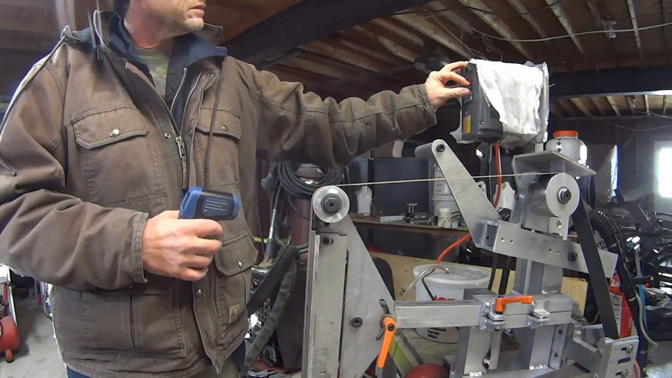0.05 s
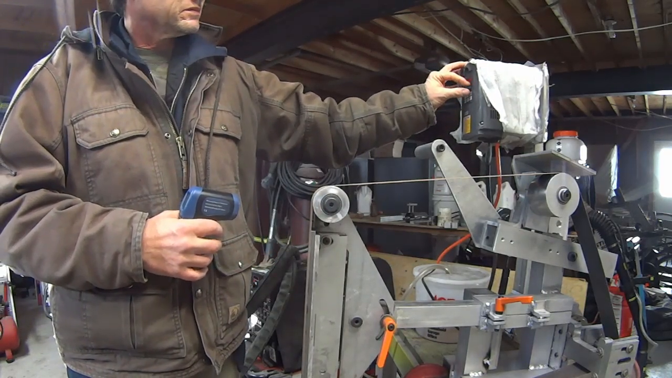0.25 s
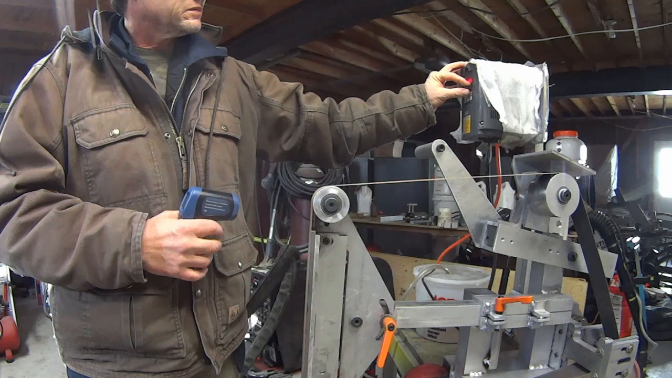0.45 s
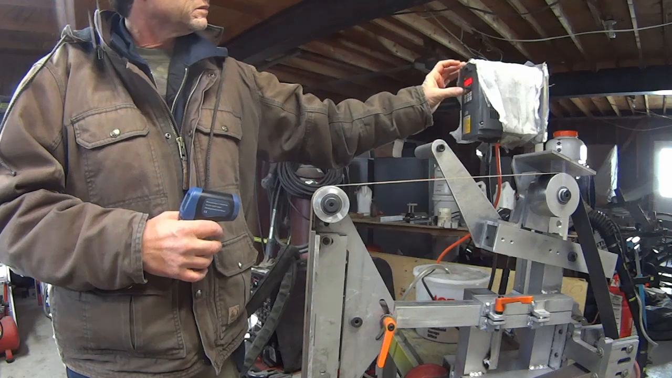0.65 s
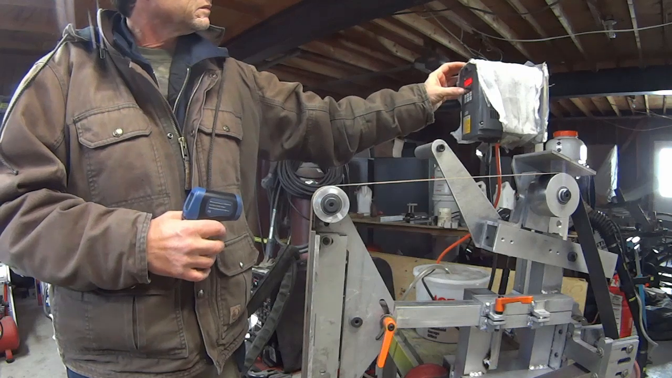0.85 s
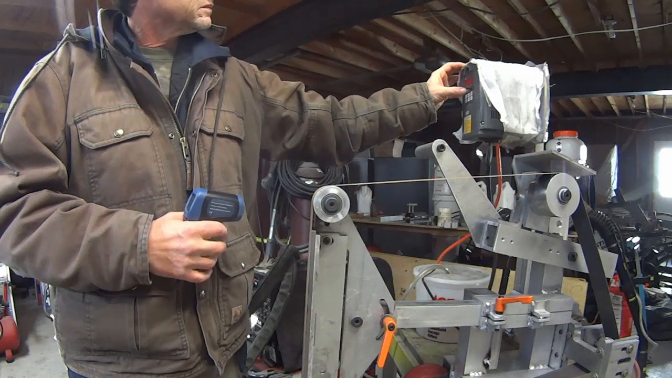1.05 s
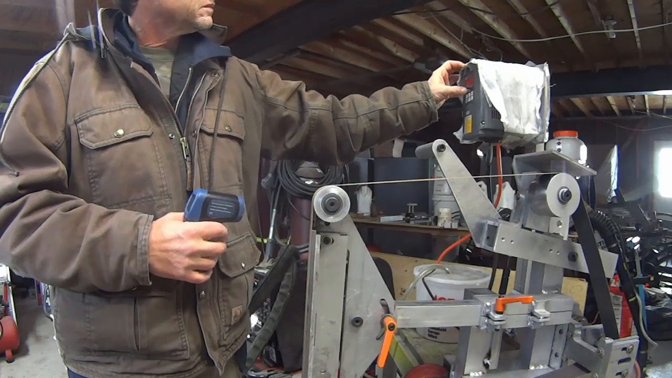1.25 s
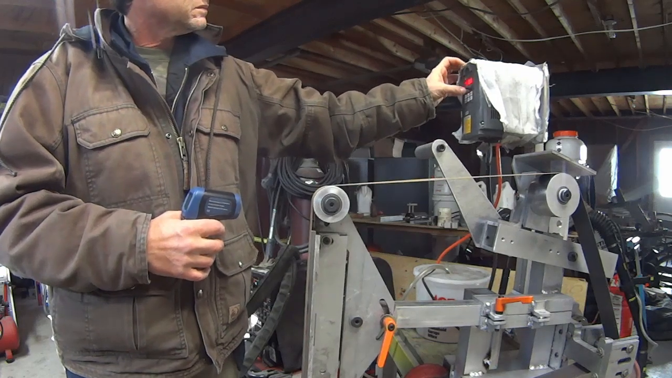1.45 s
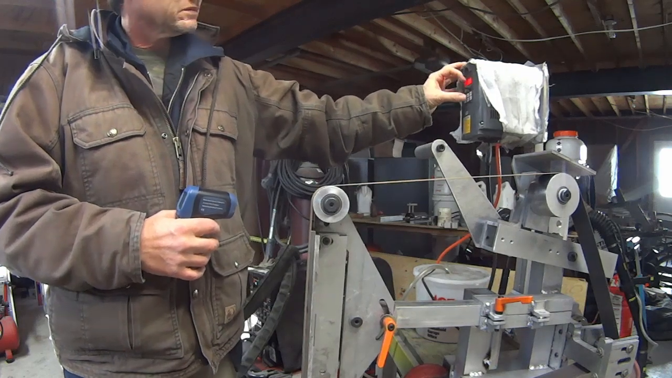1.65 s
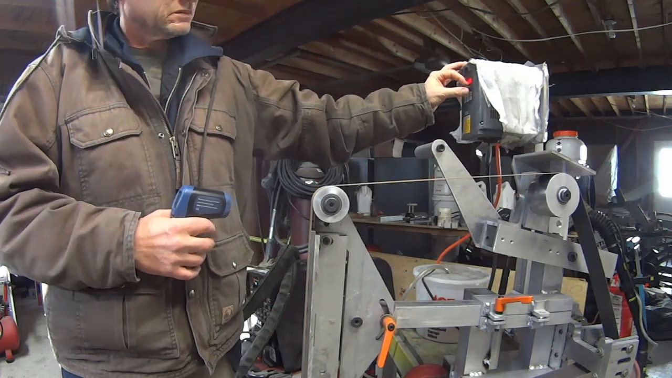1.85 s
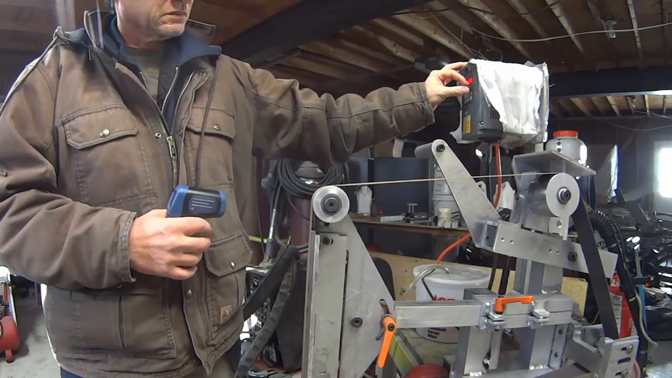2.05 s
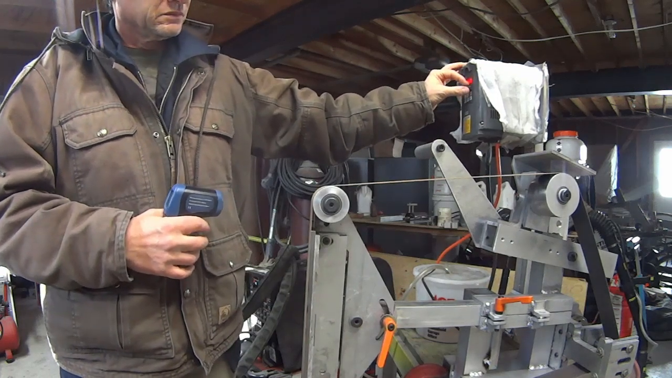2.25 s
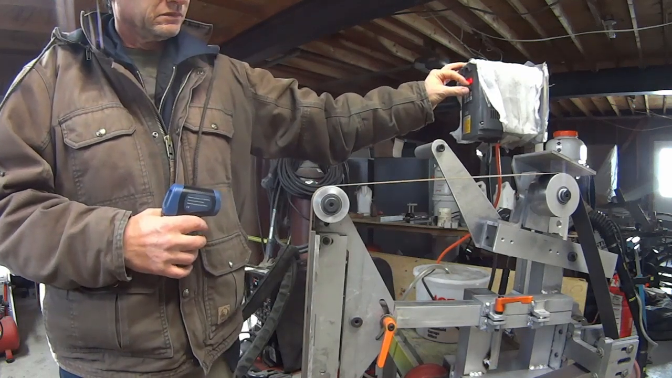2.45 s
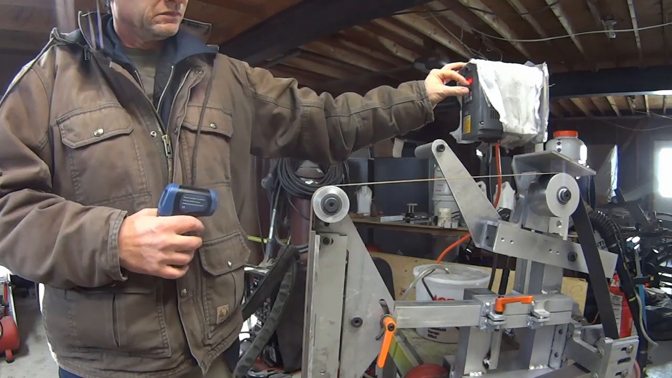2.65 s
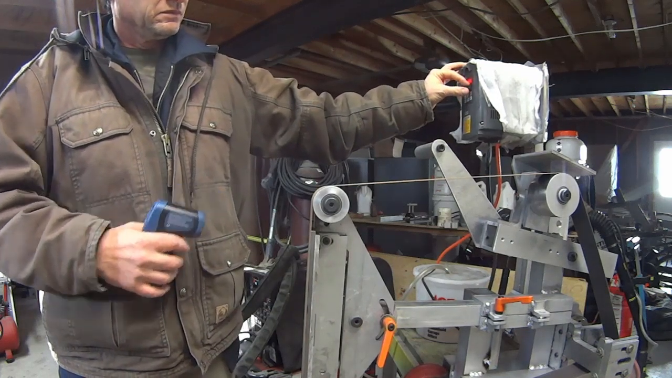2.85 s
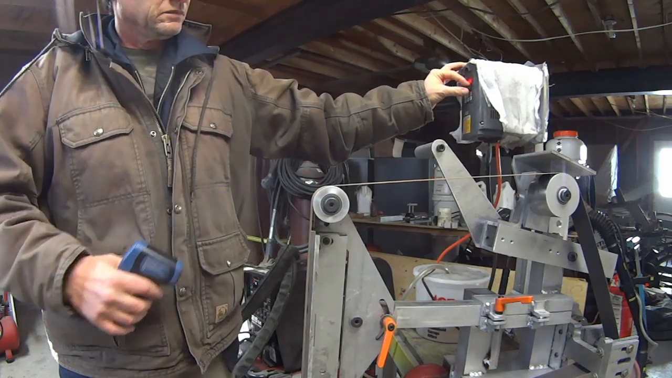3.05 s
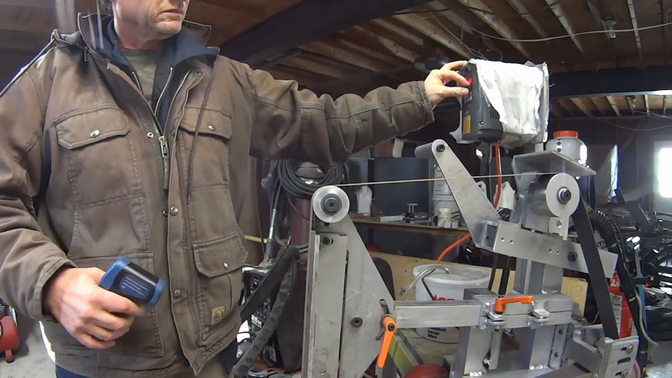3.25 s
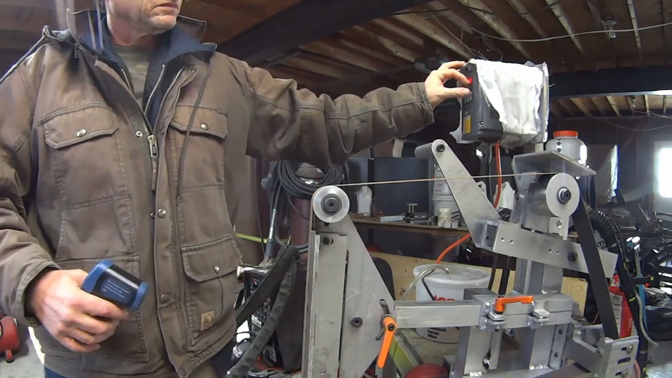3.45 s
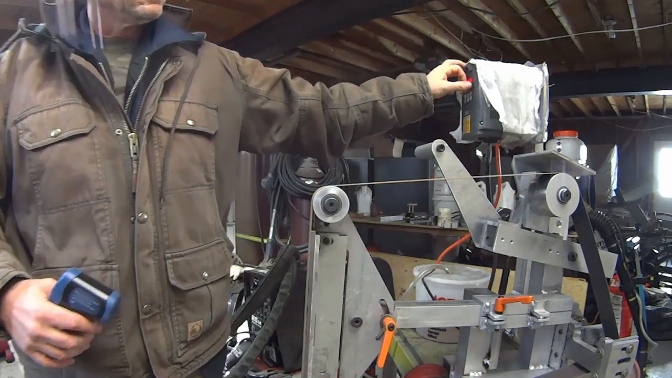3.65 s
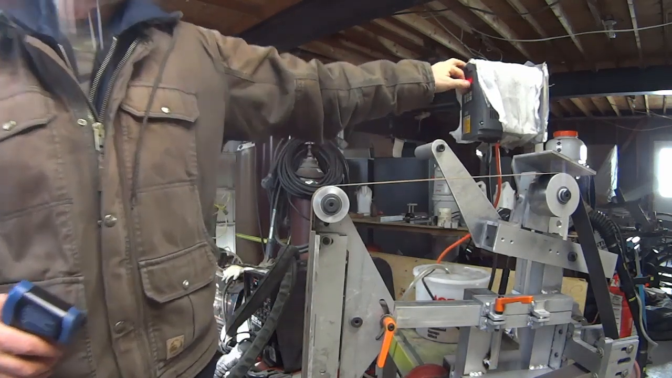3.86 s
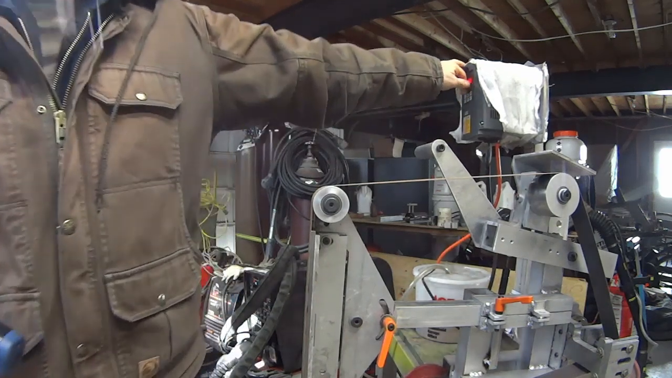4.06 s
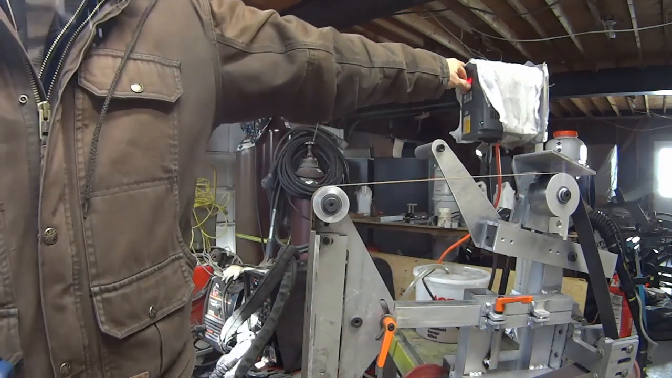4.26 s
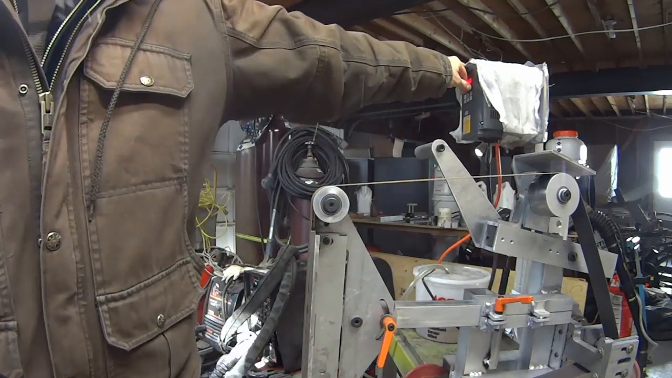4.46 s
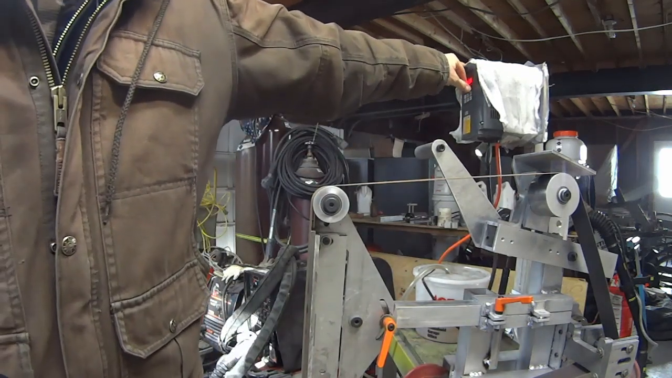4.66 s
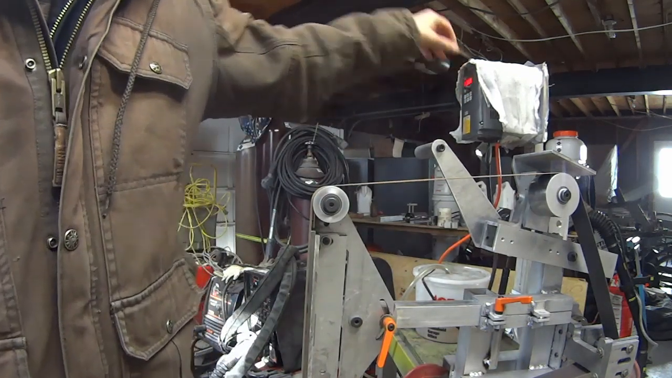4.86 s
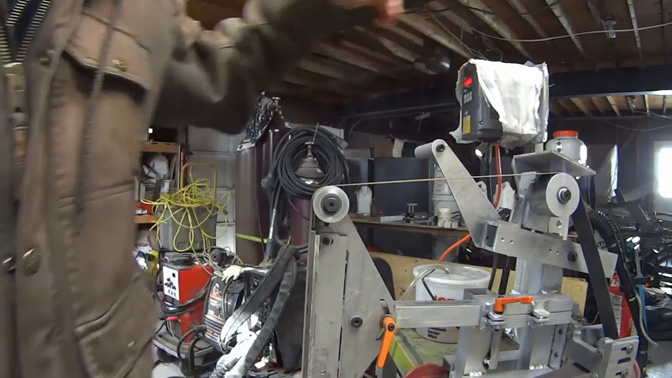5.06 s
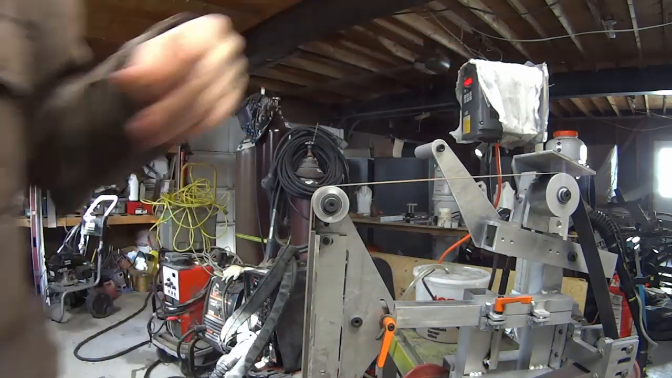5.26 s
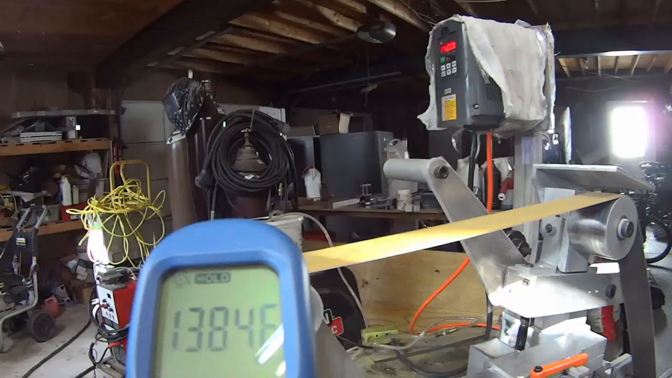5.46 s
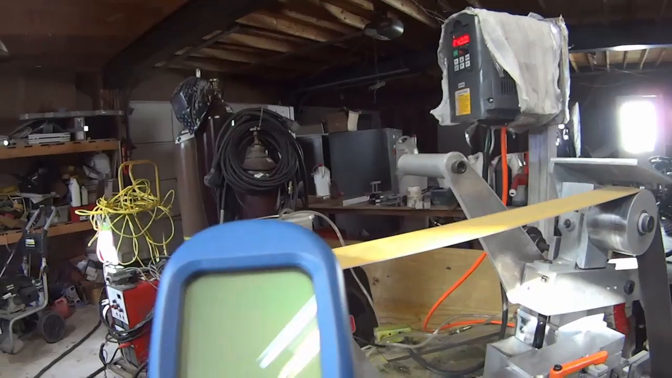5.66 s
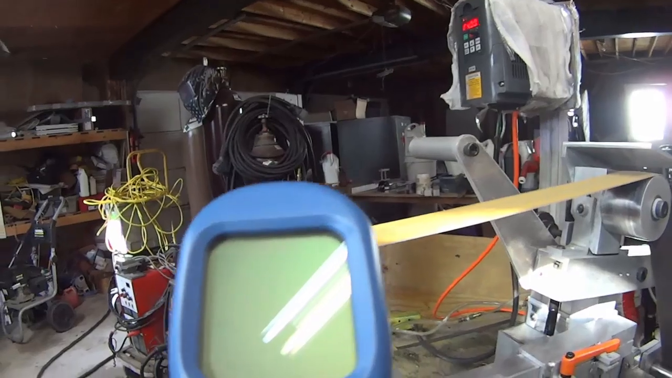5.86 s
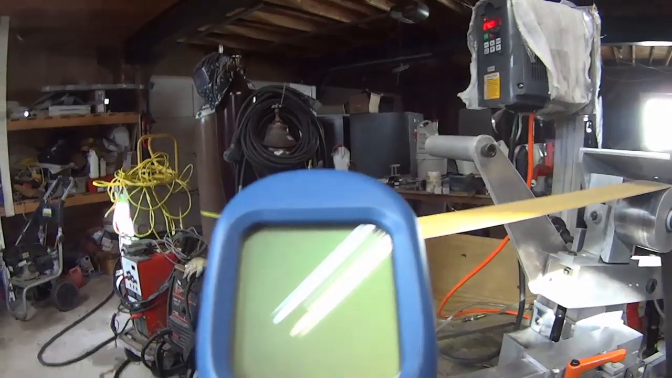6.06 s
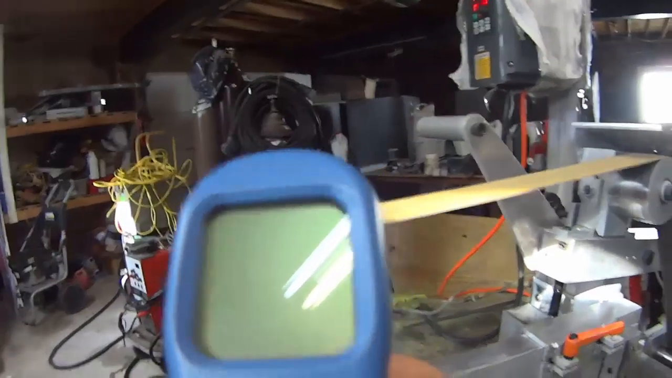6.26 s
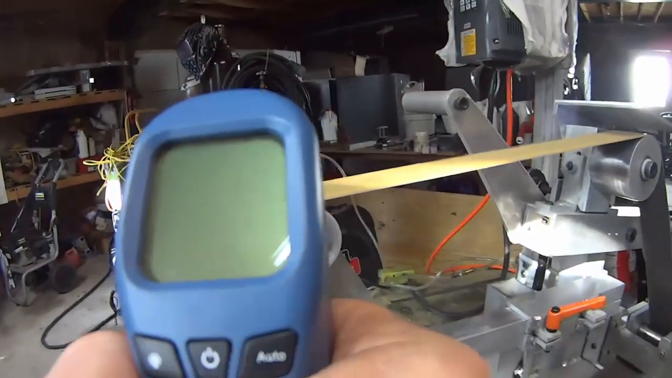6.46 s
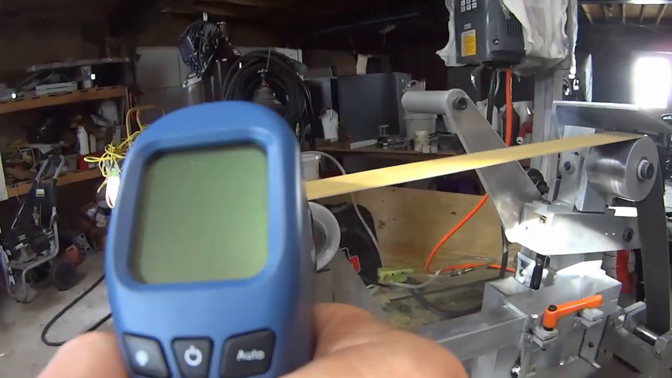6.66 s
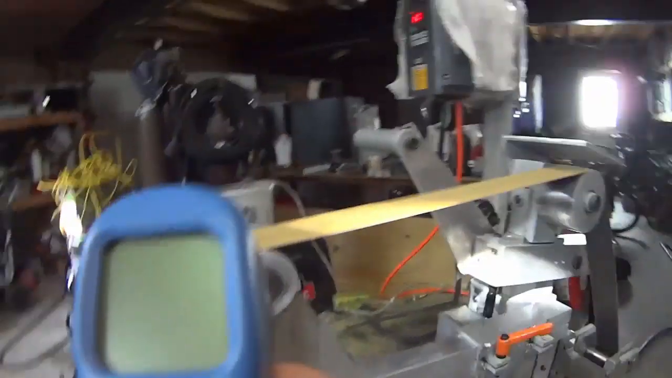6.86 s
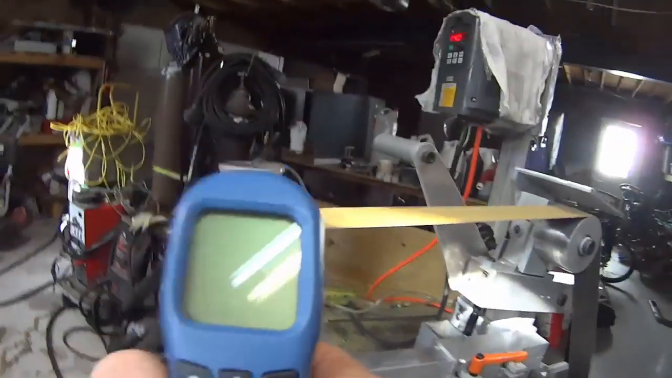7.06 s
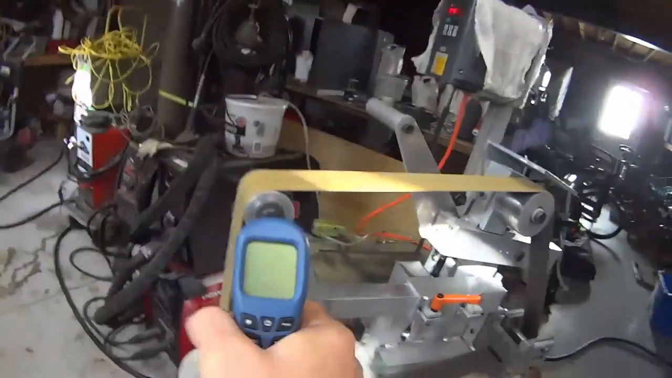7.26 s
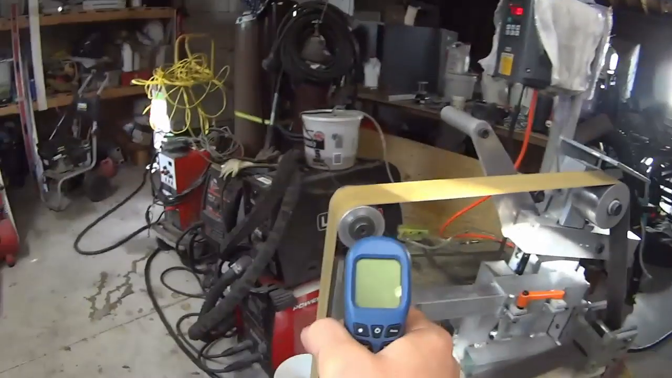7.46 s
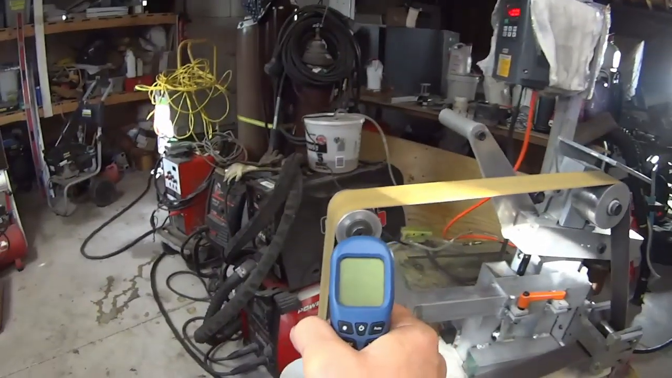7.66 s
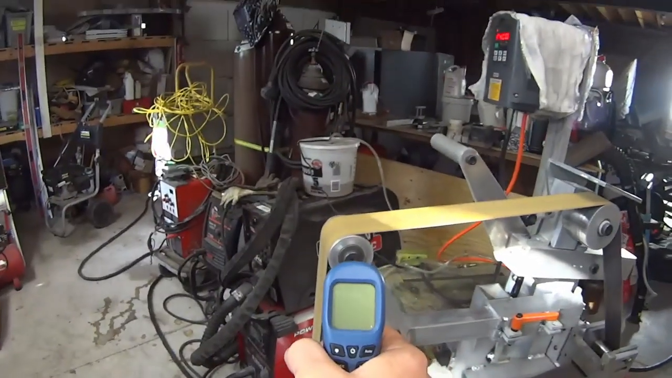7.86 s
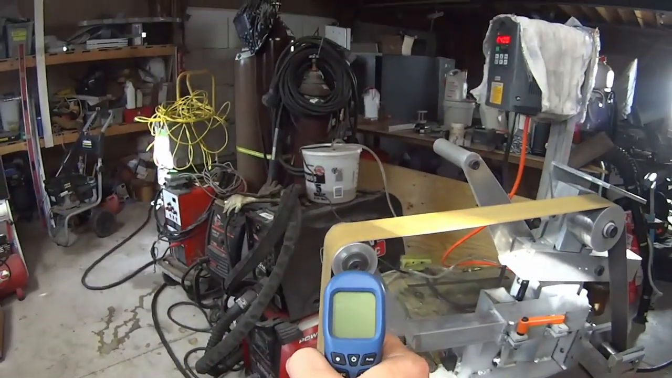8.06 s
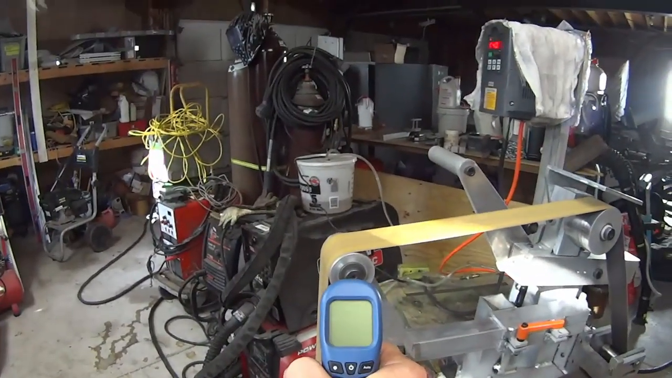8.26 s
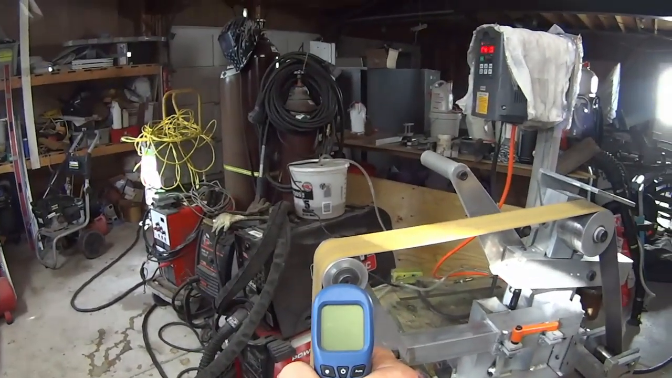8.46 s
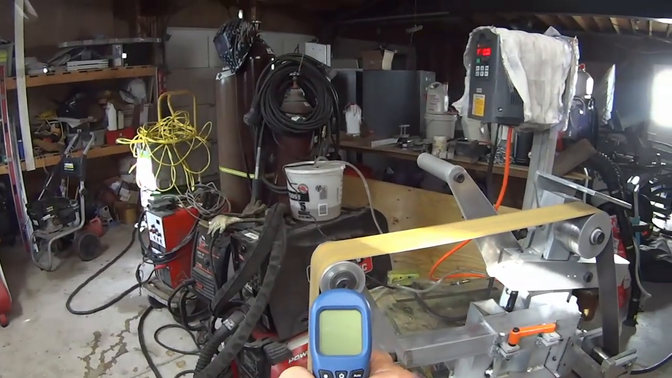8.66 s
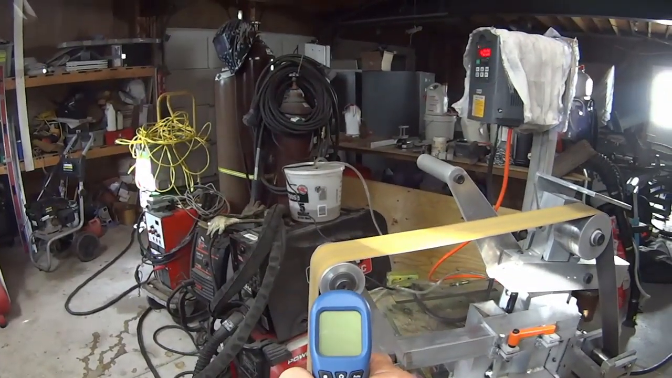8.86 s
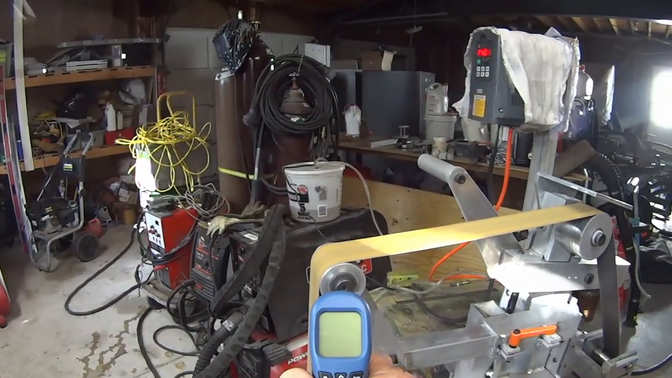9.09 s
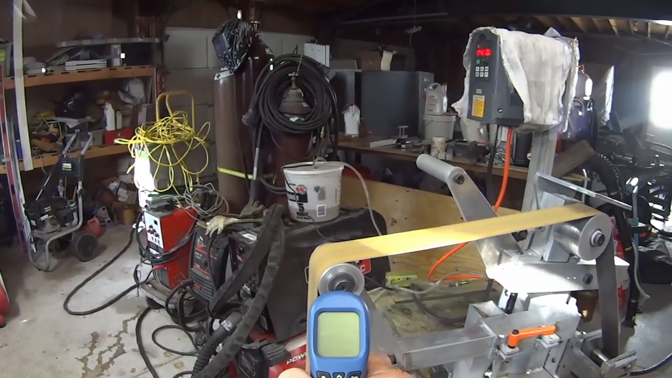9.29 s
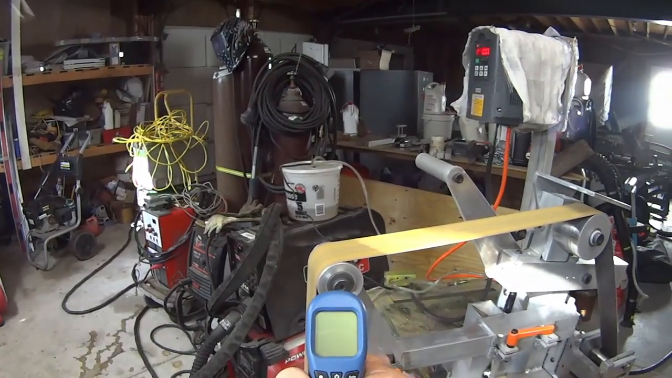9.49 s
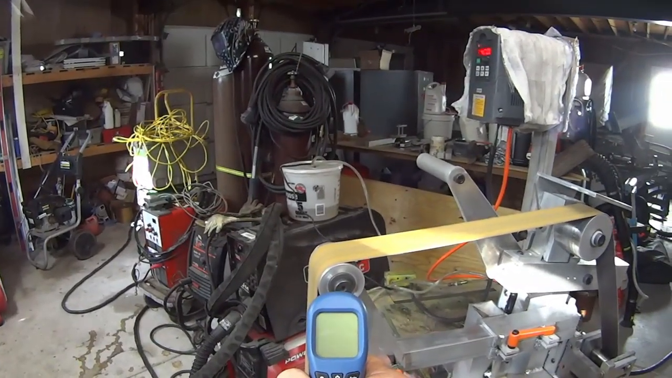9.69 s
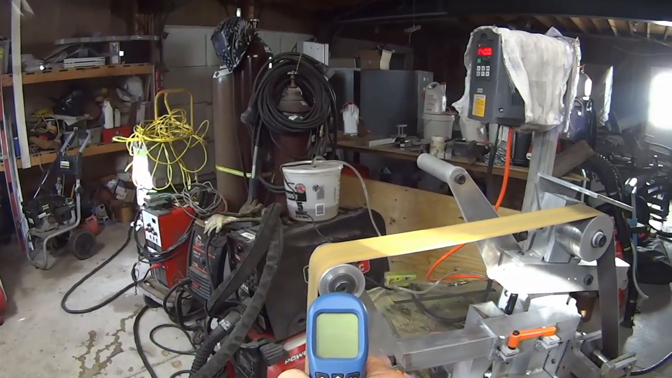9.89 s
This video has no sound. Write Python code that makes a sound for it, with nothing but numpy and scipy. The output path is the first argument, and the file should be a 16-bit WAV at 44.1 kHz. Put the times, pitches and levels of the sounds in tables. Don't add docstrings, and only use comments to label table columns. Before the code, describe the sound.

In a workshop, faint keypad clicks start a belt grinder; motor hum swells into a rising, whining roar, then cuts abruptly to a close, steady roar.

```python
import sys
import numpy as np
from scipy import signal
from scipy.fft import rfft, irfft
from scipy.io import wavfile
from scipy.ndimage import uniform_filter1d

SR = 44100
rng = np.random.default_rng(int(sys.argv[2]) if len(sys.argv) > 2 else 0)


def generate_wav(signal):
    frames = np.transpose(np.atleast_2d(signal))
    scaled = np.clip(frames, -1, 1) * 32767
    pcm = np.round(scaled).astype(np.int16)
    wavfile.write(sys.argv[1], SR, pcm)


def ratio_of_db(decibels):
    return 10 ** (np.asarray(decibels, float) / 20)


N = 437913
T = np.arange(N) / SR
HZ = np.arange(N // 2 + 1) * SR / N
FULL_HZ = 394.3


def ports(common, pan_db, differing=0):
    left = (common + differing) * ratio_of_db(pan_db / 2)
    right = (common - differing) * ratio_of_db(-pan_db / 2)
    return np.array([left, right])


def walk(rate_hz):
    hold = max(int(SR / rate_hz), 2)
    steps = np.repeat(rng.standard_normal(N // hold + 1), hold)
    return 1.295 * uniform_filter1d(uniform_filter1d(steps, hold), hold)[:N]


def level_at(s, db):
    return np.interp(T, s, db, left=-120)


def resonance(hz, centre_hz, width_hz):
    return 1 / (1 + (2 * (hz - centre_hz) / width_hz) ** 2)


def colour_db(hz, points, frame=()):
    f, db = np.transpose(points)
    smooth = np.interp(np.log(hz + 1), np.log(f), db)
    return smooth + sum(lift * resonance(hz, centre, width) for centre, width, lift in frame)


def shaped(x, gain):
    y = irfft(rfft(x) * gain, N)
    return y / np.sqrt(np.mean(y ** 2))


def tone(hz, rms_db, lead=0.):
    return np.sqrt(2) * ratio_of_db(rms_db) * np.sin(2 * np.pi * np.cumsum(hz) / SR + lead)


def ring(s, peak_db, hz, t60):
    t = np.clip(T - s, 0, 1)
    return ratio_of_db(peak_db) * np.sin(2 * np.pi * hz * t) * np.exp(-np.log(1000) * t / t60)


# (time [s], rumble [dB], frame [dB], body [dB], hiss [dB], left minus right [dB])
BELT = [
    [(1.22, -65, -70, -72, -68, -1.5), (1.25, -66, -65, -61, -53, -1.0), (1.3, -47, -49, -47, -45, -2),
     (1.46, -46, -42.5, -43, -41, -1.5), (1.53, -49, -41.5, -37.5, -35.5, -2),
     (1.66, -42, -37, -35.5, -34.5, -2.0), (1.84, -44, -31, -29, -30.5, -1.5),
     (2.04, -40, -26.5, -18, -21, -2.0), (2.32, -46, -28.5, -18.5, -18.5, -2),
     (2.48, -47, -30.5, -19.5, -17.5, -2), (2.64, -50, -31, -19.5, -16.5, -2),
     (2.7, -44, -32.5, -19.5, -16.5, -2), (2.82, -47, -31, -18.5, -17.5, -2.5),
     (2.95, -48, -33.5, -19, -17.5, -2), (3.77, -50, -38.5, -24, -16, -1.5),
     (4.03, -46, -41, -26, -16.5, -2), (4.18, -49, -43, -24.5, -18, -1.5),
     (4.22, -46, -37.5, -24.5, -17, -1.5), (4.33, -48, -35.5, -26.5, -16.5, -2),
     (4.77, -48.5, -37, -25, -16, -1.5), (5.5, -48, -34.5, -24.5, -15, -2)],
    [(5.53, -45, -33, -21.5, -19, -4), (5.86, -43, -30.5, -23, -19.5, -4), (6.04, -47, -32.5, -22, -21, -5),
     (6.14, -36, -30, -22, -19.5, -3.0), (6.18, -32, -26, -22.5, -20.5, -2.5),
     (6.24, -42, -32, -23.5, -17.5, -2.5), (6.45, -41, -30.5, -21.5, -21, -3.0),
     (6.48, -39, -31, -22, -20.5, -4.5), (7.11, -42.5, -32, -22, -18, -3),
     (7.15, -44, -34, -22.5, -18, -2.5), (7.23, -42, -31, -23.5, -18, -2.0),
     (7.44, -42, -32, -23, -18.5, -4.5), (7.62, -43, -33.5, -24, -19.5, -5),
     (7.65, -41, -31.5, -22.5, -18.5, -3), (8.4, -43.5, -33, -23, -18.5, -3),
     (8.46, -48, -30, -24, -17.5, -2.0), (8.52, -42, -34, -24, -18.5, -3), (8.58, -42, -33, -24, -18, -2.5),
     (9.06, -43, -32, -21.5, -18, -3), (9.84, -45, -32, -22, -19, -4), (9.93, -39, -32, -22, -19, -2.5)],
]
BELT_EDGES_HZ = (0, 700, 2400, 4400, 20000)
# (frequency [Hz], density [dB per Hz])
RUMBLE_COLOUR = [(30, -7), (60, -13), (150, -4.5), (300, -2), (500, -3), (700, 0)]


def belt_noise(rows, colour, frame, noise_db, side_db):
    s, *bands_db, pan_db = np.transpose(rows)
    ticks = rng.standard_normal((2, N)) * ratio_of_db(1.5 * rng.exponential(size=(2, N)))
    joint_db = colour[1][1]
    points = RUMBLE_COLOUR[:-1] + [(f, db - joint_db) for f, db in colour[1:]]
    tint = ratio_of_db(colour_db(HZ, points, frame))
    pan = np.interp(T, s, pan_db)
    out = 0
    for k in range(4):
        band = tint * (HZ >= BELT_EDGES_HZ[k]) * (HZ < BELT_EDGES_HZ[k + 1])
        flicker_db = 0.55 * walk(9) + 0.75 * walk(40)
        db = level_at(s, bands_db[k]) + noise_db[k] + flicker_db
        differing = ratio_of_db(side_db[k]) * shaped(ticks[1], band)
        out = out + ratio_of_db(db) * ports(shaped(ticks[0], band), pan, differing)
    return out


# (frequency [Hz], density [dB per Hz])
FAR_COLOUR = [(410, -52), (700, -34.5), (1170, -20), (2390, -12.5), (2740, 2.5), (4340, -5.5), (5400, -4),
              (6060, -4.5), (6640, 3), (7980, -9), (9160, -11.5), (10900, -24.5), (14100, -61),
              (22000, -120)]
# (frequency [Hz], width [Hz], lift [dB])
FAR_FRAME = [(1077, 25, 9), (1252, 70, 7.5), (1494, 42, 4.5), (1920, 77, 2.5), (2650, 90, 0), (3240, 77, 2),
             (4790, 260, 3.5), (5384, 95, 6.5), (7140, 100, 4.5), (8370, 120, 6)]
# (rumble, frame, body, hiss [dB])
FAR_NOISE_DB = (-14, -1, -0.33, -2.5)
# (rumble, frame, body, hiss [dB])
FAR_SIDE_DB = (-3.5, -5.5, -10.5, -11)


def far_belt():
    return belt_noise(BELT[0], FAR_COLOUR, FAR_FRAME, FAR_NOISE_DB, FAR_SIDE_DB)


# (frequency [Hz], density [dB per Hz])
NEAR_COLOUR = [(410, -67), (700, -31.5), (999, -23.5), (1100, -18.5), (1160, -17), (1440, -14), (1580, -11),
               (1880, -15.5), (2840, -2.5), (4200, -6.5), (6800, -5), (8650, -11), (10900, -23),
               (14100, -61), (22000, -120)]
# (frequency [Hz], width [Hz], lift [dB])
NEAR_FRAME = [(1290, 92, 3), (2240, 150, 3.5), (2735, 160, 2.2), (3116, 90, 3.6), (3870, 44, 2.1),
              (4650, 250, 2.1), (5390, 230, 3.6), (6420, 90, 2.6), (7000, 150, 2.8), (8340, 150, 2.5)]
# (rumble, frame, body, hiss [dB])
NEAR_NOISE_DB = (-16.5, -3.5, -2.5, -3)
# (rumble, frame, body, hiss [dB])
NEAR_SIDE_DB = (-7, -1.5, -10, -10.5)


def near_belt():
    return belt_noise(BELT[1], NEAR_COLOUR, NEAR_FRAME, NEAR_NOISE_DB, NEAR_SIDE_DB)


# (time [s], ball-pass rate [Hz], level of that line [dB])
RUNUP = [(2.3, 86.6, -69), (2.4, 102.5, -59), (2.46, 102.3, -49), (2.6, 127.4, -62), (2.69, 134, -47),
         (2.77, 147, -44), (2.82, 151.0, -43), (2.94, 175.4, -65), (3.32, 216, -60), (3.34, 223, -54),
         (3.53, 250.8, -65), (3.64, 260.6, -52), (3.72, 269.4, -69), (3.82, 288.2, -48), (3.88, 293, -55),
         (4.04, 312, -40), (4.1, 322.8, -53), (4.48, 373, -49.5), (4.79, 393.4, -46.5), (5.5, 394.8, -51.5)]


def wheel_speed():
    s, hz, _ = np.transpose(RUNUP)
    return np.interp(T, [1.25, *s], [0, *hz]) / FULL_HZ


# (frequency [Hz], level [dB])
FAR_LINES = [(1184, -42), (1577, -42), (1728, -46.5), (1970, -45.5), (2121, -44), (2670, -41.5),
             (2939, -53), (3063, -34), (3155, -49.5), (3273, -49), (3865, -36), (4834, -39), (5190, -38.5),
             (5437, -59), (5545, -39.5), (5620, -28.5), (5690, -57), (5830, -47)]


def far_whine(speed):
    s, _, first_db = np.transpose(RUNUP)
    out = ports(tone(speed * FULL_HZ, level_at(s, first_db)), -6)
    for hz, db in FAR_LINES + [(2 * FULL_HZ, -58), (154, -62)]:
        moving_db = colour_db(hz * speed[::64], FAR_COLOUR, FAR_FRAME)
        crossing_db = moving_db - colour_db(hz, FAR_COLOUR, FAR_FRAME)
        lift_db = np.repeat(1.33 * np.maximum(crossing_db, -12), 64)[:N]
        now_db = db + lift_db + 12 * np.log10(speed + .01) + 2 * walk(6)
        lead = rng.uniform(-1.1, 1, 2)
        out += [tone(hz * speed, now_db - 3.5, lead[0]), tone(hz * speed, now_db - 0.5, lead[1])]
    return out


# (frequency [Hz], by the thermometer [dB], while swinging [dB],
# at the wheel [dB], left minus right [dB])
NEAR_LINES = [(394.4, -47.5, -49, -42.5, -6.5), (1012, -49, -52, -51, -4.5),
              (1182, -39.5, -41, -47.5, -6.5), (1580, -42.5, -43, -36.5, -4), (1748.2, -38.5, -44, -47, -1),
              (2152, -37.5, -41, -43.5, 0), (2252, -42, -40, -46, -4), (2300, -48, -41, -42, -4),
              (2378, -38, -38, -53, 4), (2560, -46, -47, -54, -3), (2760, -33, -30.5, -32.5, -10),
              (2830, -49, -35, -41, 3), (2934, -33.5, -32.5, -33, 2), (3096, -32, -30, -39.5, -0.5),
              (3147, -37, -39, -34.5, -9), (3900, -34, -35, -34, 1), (3927.1, -40, -48, -39.5, 0),
              (4680, -34, -34, -40.5, 2), (4870, -32, -43, -39, -3), (5240, -33.5, -30.5, -30, 1),
              (5650, -23, -31.5, -27.5, -2), (6080, -41, -42, -44, 2), (6190, -43, -35, -36, -1),
              (6450, -46, -29, -35, -1), (6630, -32, -38, -26.5, -4), (7416, -31.5, -33, -30, 4),
              (8178.6, -49, -43, -51, -3), (8320, -38.5, -40, -35.5, -16), (8770, -50, -38, -33.5, -3),
              (9100, -45, -43.5, -47, -20)]
NEAR_STOPS_S = (6.3, 6.6, 7.1, 7.25)


def near_whine():
    out = np.zeros((2, N))
    for hz, a_db, b_db, c_db, pan_db in NEAR_LINES + [(788.0, -64, -69, -54, 1), (6992, -50, -34.5, -44, -10)]:
        db = np.interp(T, NEAR_STOPS_S, (a_db, b_db, b_db, c_db))
        db = db + 1.5 * walk(2.985) + 1.32 * walk(14)
        pitch = hz * (1 + 0.000298 * walk(5))
        lead = rng.uniform(-0.5, 0.55, 2) + rng.uniform(0, 2 * np.pi)
        out += [tone(pitch, db + pan_db / 2, lead[0]), tone(pitch, db - pan_db / 2, lead[1])]
    return out


# (time [s], level [dB])
IDLER = [(2.3, -49), (3, -29), (3.6, -23), (4.3, -22.5), (5, -24.5), (5.5, -28)]


def idler(speed):
    turns_per_ball_pass = 142.2 / FULL_HZ
    turns = np.cumsum(speed * FULL_HZ * turns_per_ball_pass / SR)
    count = np.arange(1, int(turns[-1]))
    uneven = count + 0.003 * rng.standard_normal(len(count))
    at = np.interp(uneven, turns, np.arange(N))
    fine = np.zeros(4 * N)
    fine[(4 * at).astype(int)] = ratio_of_db(1.8 * rng.standard_normal(len(count)))
    ticks = signal.resample_poly(fine, 1, 4) / np.sqrt(speed + .02)
    hub = resonance(HZ, 6380, 350)
    scatter = np.exp(1j * np.cumsum(rng.normal(0, .02, len(HZ))))
    return ports(shaped(ticks, hub * scatter) * ratio_of_db(level_at(*np.transpose(IDLER))), -1)


# (time [s], drive rate [Hz], level [dB])
INVERTER = [
    (1.244, 7.3, -90),
    (1.248, 8.2, -43),
    (1.5, 32, -42),
    (1.8, 50, -39.5),
    (2.0, 72, -38),
    (2.15, 85, -55),
    (2.3, 95, -70),
]
# (multiple of the drive rate [1], level [dB])
SIDEBANDS = [(-0.5, -2.5), (-1, -9.5), (1.5, -6.5), (-2, -10), (5, -2.5), (-6, -10), (6, -7)]


def inverter():
    carrier_hz = 8920
    s, rate_hz, db = np.transpose(INVERTER)
    rate = np.interp(T, s, rate_hz)
    level_db = np.interp(T, s, db, left=-140, right=-140)
    song = 0
    for multiple, side_db in SIDEBANDS:
        line_db = level_db + side_db + 2 * walk(20)
        song = song + tone(carrier_hz + multiple * rate, line_db, rng.uniform(0, 6.6))
    return ports(song, -7.5)


# (time [s], frequency [Hz], level [dB])
HUM = [(1.27, 88, -75), (1.3, 92, -56), (1.39, 101.7, -48), (1.47, 109, -38), (1.55, 128, -53),
       (1.64, 143.2, -30.5), (1.71, 155, -36), (1.8, 168.6, -50), (1.9, 180, -65)]


def motor_hum():
    s, hz, db = np.transpose(HUM)
    return ports(tone(np.interp(T, s, hz), np.interp(T, s, db, left=-140, right=-140)), -5.5)


# (time [s], peak level [dB], frequency [Hz], decay time t60 [s])
KEYS = [
    (.6035, -47, 6500, .012),
    (.6294, -48, 7000, .015),
    (1.0594, -50, 7000, .015),
    (1.0844, -44, 2950, 0.1),
    (1.086, -49, 1750, .04),
    (1.088, -45, 5200, .03),
    (1.1707, -32.5, 4900, .015),
    (1.171, -38, 7260, 0.011),
    (1.19, -54, 6050, .06),
    (1.225, -52, 6050, .06),
]


def keypad():
    return ports(sum(ring(*key) for key in KEYS), -1)


# (time [s], thump level [dB], thump frequency [Hz], case ring level [dB])
KNOCKS = [(5.749, -39, 121, -34), (6.116, -54, 150, -36), (6.132, -37, 120, -29), (6.175, -42, 110, -36),
          (6.185, -44, 110, -21.5), (6.68, -46, 120, -52), (6.745, -50, 150, -33), (6.762, -41, 90, -36),
          (6.79, -46, 60, -56), (6.87, -45, 130, -30), (7.147, -30, 75.5, -55)]
CASE_HZ = (844, 1300)


def case_knocks():
    knocks = 0
    for s, thump_db, thump_hz, case_db in KNOCKS:
        knocks = knocks + ring(s, thump_db + 3.5, thump_hz, .045)
        knocks = knocks + sum(ring(s, case_db, hz, 0.029) for hz in CASE_HZ)
    return ports(knocks, -5.5)


# (frequency [Hz], density [dB per Hz])
SHOP = [(18, -52), (30, -22), (60, -9), (160, -10), (191, -3), (227, -17), (263, -1), (312, -12),
        (623, -12.5), (671, -3.5), (759, -17.5), (1240, -9), (2030, -17), (2870, -6.5), (10900, -25),
        (14100, -60), (22000, -120)]


def shop():
    tint = ratio_of_db(colour_db(HZ, SHOP))
    mid = shaped(rng.standard_normal(N), tint)
    side = shaped(rng.standard_normal(N), tint)
    ducking_db = 5.4 * np.clip(T - 1.5, 0, 1)
    return ports(mid, 0, ratio_of_db(-2) * side) * ratio_of_db(-56.5 + .5 * walk(6) - ducking_db)


def scene():
    change_s, fade_s = 5.5143, .008
    speed = wheel_speed()
    far = far_belt() + far_whine(speed) + idler(speed) + inverter() + motor_hum()
    near = near_belt() + near_whine()
    machine = np.where(T < change_s, far, near)
    edge = np.clip(abs(T - change_s) / fade_s, 0, 1)
    return (machine + keypad() + case_knocks() + shop()) * edge


def low_pass(x):
    return signal.sosfilt(signal.butter(12, 11030, fs=SR, output="sos"), x)


def record(dry):
    return low_pass(dry)


dry = scene()
out = record(dry)
generate_wav(out)
```